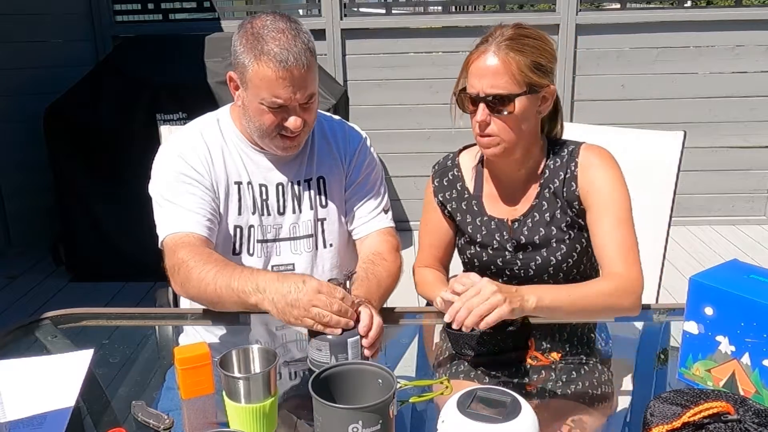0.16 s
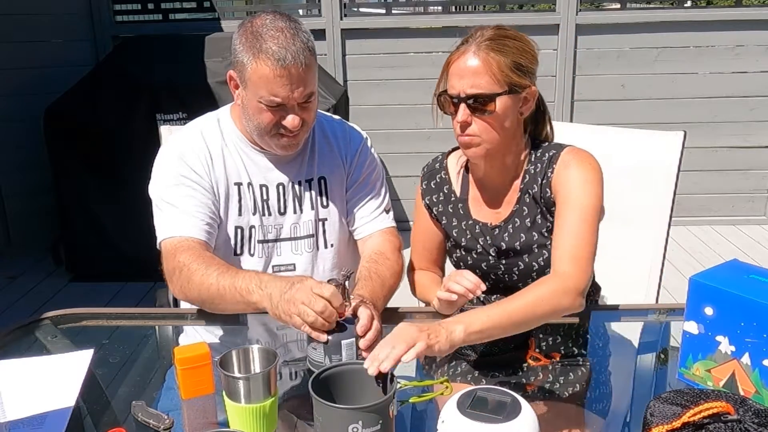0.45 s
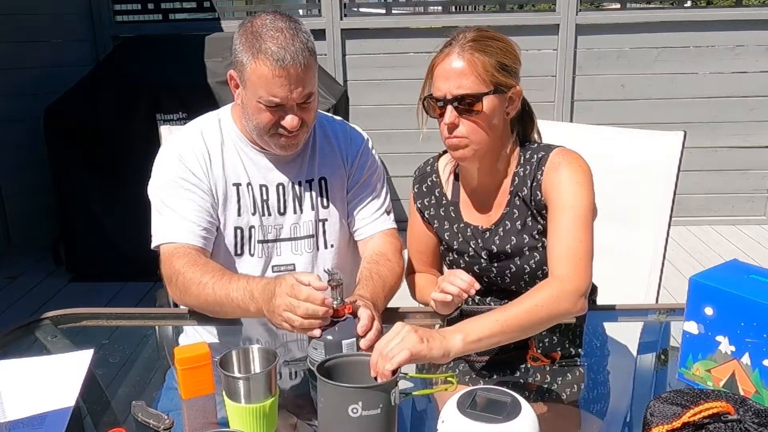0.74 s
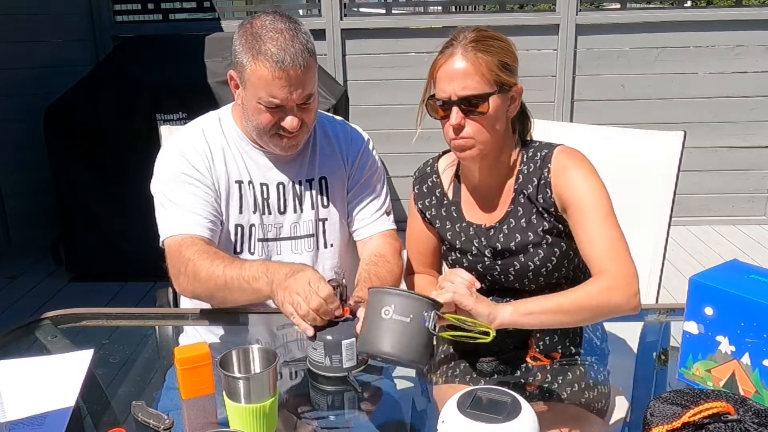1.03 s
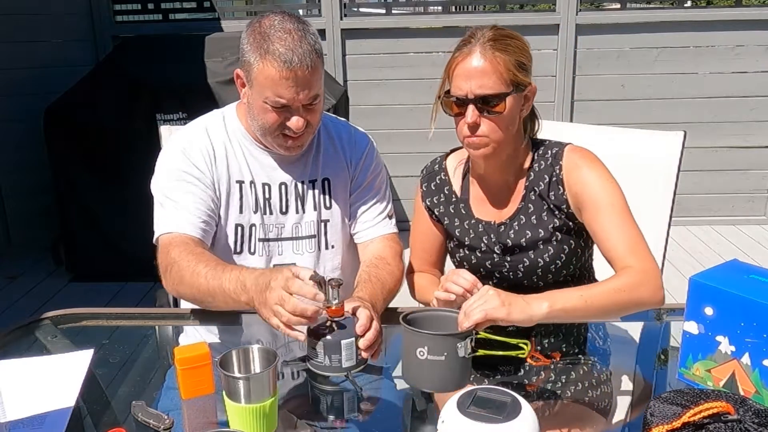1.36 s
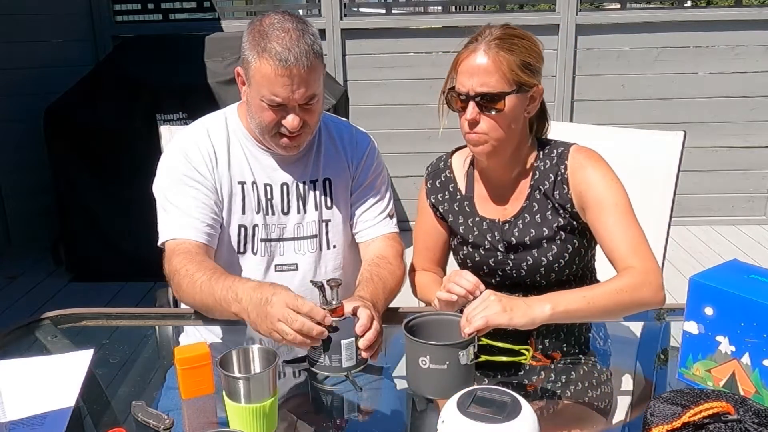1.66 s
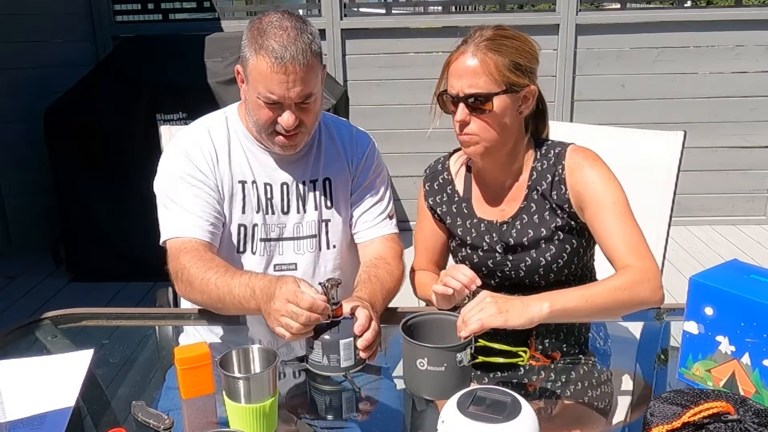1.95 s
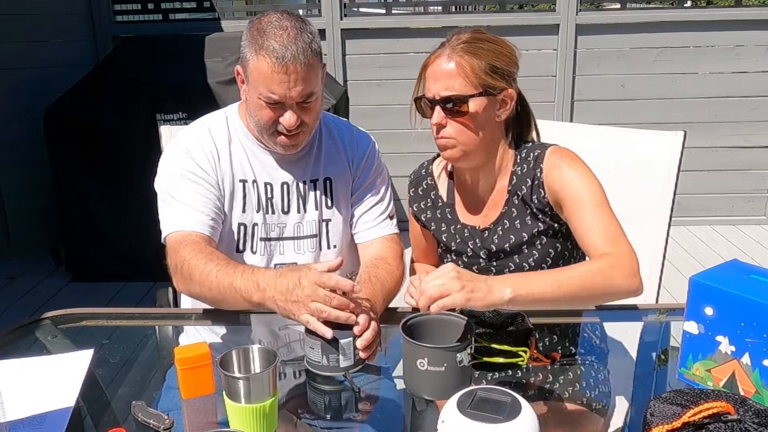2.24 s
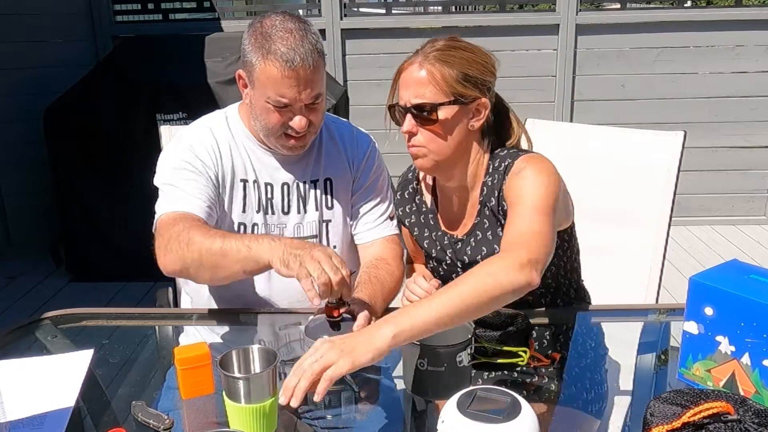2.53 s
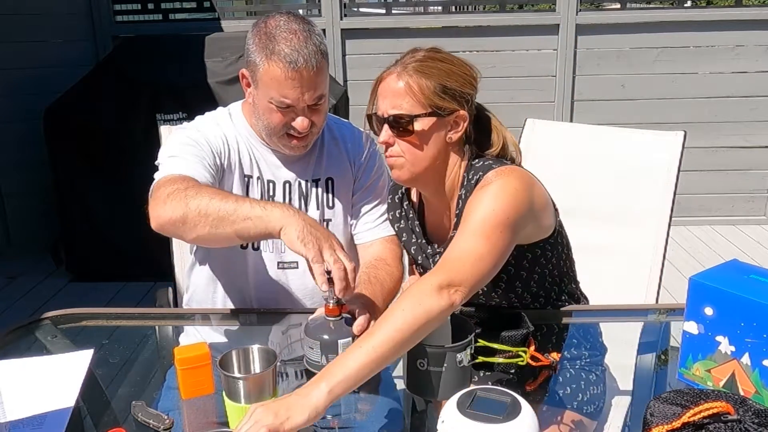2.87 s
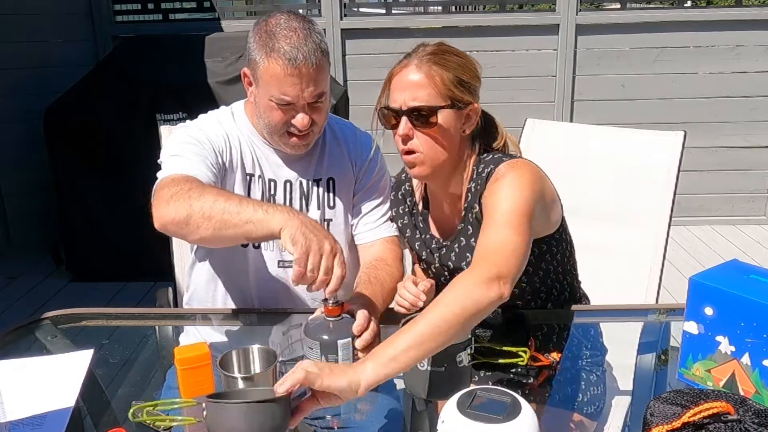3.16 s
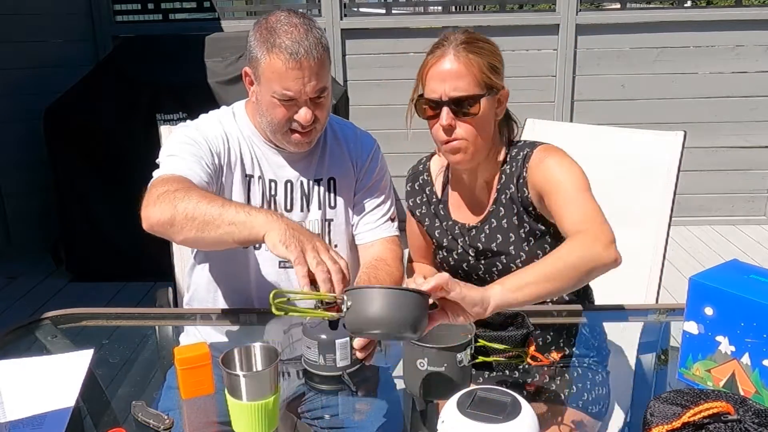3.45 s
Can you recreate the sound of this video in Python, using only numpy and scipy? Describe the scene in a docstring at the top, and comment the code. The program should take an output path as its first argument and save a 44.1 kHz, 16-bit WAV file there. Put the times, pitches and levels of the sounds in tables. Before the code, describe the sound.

Metal cookware clicks lightly while being handled, then a pan clangs against a steel cup.

```python
"""A fenced deck, one microphone close to a glass table where two people handle camping cookware.
A small gas stove snaps, pings, clicks and rubs as it is fitted together, and a pot is set down softly.
Then a lifted pan clangs against a steel cup, and metal knocks down on the table top. Each struck thing
sounds as a few distinct modes over a dense ring. Nearby walls send back short echoes; handling and air
thump on the microphone over a quiet outdoor background."""
import sys
import numpy as np
from scipy import signal
from scipy.fft import rfft, irfft
from scipy.io import wavfile

SR = 44100
rng = np.random.default_rng(int(sys.argv[2]) if len(sys.argv) > 2 else 0)


def output_pcm(signal):
    """Save a mono or channel-first signal as 16-bit PCM at the path in sys.argv[1].

    Samples are clipped to [-1, 1] before scaling.
    """
    pcm = np.clip(np.atleast_2d(signal).T, -1, 1) * 32767
    wavfile.write(sys.argv[1], SR, np.round(pcm).astype(np.int16))


N = 158760
T = np.arange(N) / SR
AGE = T[:int(.3 * SR)]  # seconds since a strike

# The distant background. Each row: frequency in Hz, level per Hz in dB.
OUTDOOR_SPECTRUM = [(22, -2.5), (45, 0), (75, -3), (100, -9), (130, -10), (190, -13.5), (550, -14.5),
                    (800, -11), (980, -10.5), (1200, -15.5), (1600, -20), (2450, -23), (2800, -19),
                    (3200, -26.5), (4500, -33), (7000, -41.5), (11000, -48.5), (16000, -60)]
# Low thumps from handling and air on the microphone, the last one the dull thud of the pan grazing the cup; and
# parts sliding. Each row: middle in seconds, half length in seconds, level in dB, centre in Hz, spread in
# octaves.
LOW_THUMPS = [(.05, .05, -52.5, 77.5, 0.11), (.41, 0.025, -46, 65.4, 0.12), (.5, 0.062, -42.5, 30.5, 0.26),
              (1.045, 0.039, -36, 60.5, 0.28), (1.66, .04, -51, 70.4, 0.27),
              (1.855, 0.023, -47.5, 112, 0.17), (2.02, 0.024, -53.5, 153, 0.11),
              (2.14, 0.05, -53, 120, 0.18), (3.387, 0.0063, -35, 170, 0.31)]
PART_RUBS = [(.052, 0.023, -56.5, 3880, 0.33), (.04, 0.077, -72, 9100, 0.46),
             (.278, 0.016, -66, 5840, 0.54), (.305, 0.032, -69, 12000, .5), (.69, 0.055, -76, 9250, 0.5),
             (1.31, 0.041, -79, 8500, .6), (1.55, 0.033, -76, 8900, 0.7), (2.97, 0.14, -78, 9800, 0.72),
             (3.355, .018, -69, 5956, 0.38)]

# Distinct modes of each struck thing. Each row: frequency in Hz, level in dB, t60 in seconds.
STOVE_MODES = [(2439, -10, .1), (2601, -6, .1), (2665, -10, .12), (3112, .5, .115), (3261, -6, .12),
               (3602, -2, .11), (3930, -8, .1), (4215, -11, .1), (4400, -10, .08), (4689, -4, .075),
               (5200, -13, .08), (5643, -3, .06), (6120, -6, .055), (6660, -7, .055), (7280, -8, .05),
               (7750, -7, .04), (8382, -12, .05)]
WIRE_MODES = [(5820, -0.5, 0.043), (6200, -3, 0.059), (10430, 1, 0.033), (10830, 4.5, 0.035),
              (11400, -8, .05), (15000, -16.5, .06)]
POT_MODES = [(151, -30, .14), (245, -20, .052), (310, -13, .028), (596, 3.5, .064), (696, -17, .05)]
PAN_MODES = [(556, -15, .45), (662, -7, .13), (856, -3, .08), (918, 3, .06), (1001, 2, .12),
             (1150, -14, .12), (1416, -3, .135), (2012, -.5, .185), (2840, -7, .04), (2906, -5, .05),
             (3015, -17, .12), (3340, -7, .06), (3590, -10, .06), (3958, -17, .08), (5070, -19, .09),
             (5335, -21, .08), (5835, -23, .16), (8040, -13, .11), (8668, -12, .105), (9431, -18, .145),
             (10620, -19, .04), (11130, -17, .035), (13450, -21, .03), (13880, -21, .03), (14200, -21, .03)]
PAN_SWELLING_MODES = [(2627, -14, .28), (3214, -6.5, .115), (4770, -8, .085)]  # hardly struck, but fed by the rest of the metal
CUP_TABLE_MODES = [(155, -5, .4), (185, -9, .38), (210, -7, .32), (264, -10, .16), (345, -8, .22),
                   (369, -9, .22), (450, -7, .2), (555, .5, .17), (670, 1, .125), (885, -9, .25),
                   (1050, -14, .22), (1401, -8, .15), (1477, -8, .19), (2579, -1.5, .13), (2676, -11, .19),
                   (3025, -13, .16), (7440, -21, .1), (11300, -21, .04)]
# Their dense rings. Each row: frequency in Hz, level per third octave in dB, t60 in seconds.
STOVE_BODY = [(500, -26, 0.061), (1250, -26.5, 0.11), (1950, -9, 0.15), (2950, 2.5, 0.13),
              (3920, -2.5, .11), (5300, 3, 0.056), (7550, 0.5, 0.053), (9000, -11, 0.098),
              (10900, -18, 0.11), (15000, -27, .075)]
WIRE_BODY = [(2980, -22, .08), (6140, -10.5, 0.27), (8300, -20, 0.17), (11000, -5, .09), (13000, -28, 0.11),
             (15500, -15, .1)]
POT_BODY = [(152, -29.5, .26), (306, -29, .2), (615, -23, .24), (750, -25, .2), (1000, -35, .18),
            (2500, -37, .054), (15000, -72, .054)]
PAN_BODY = [(152.5, -26.5, .28), (348, -24, .45), (720, -21, .23), (1000, -14, .12), (1310, -17, .17),
            (2180, -23, .2), (3080, -15, .15), (4000, -22, .12), (5100, -21, .17), (6600, -28, .15),
            (11000, -29, .087), (14500, -39, .085)]
PAN_CRACK = [(151, -14.5, .04), (400, -19, .024), (700, -5, .027), (960, 12, .026), (1440, -3, .02),
             (2250, -4, .02), (3200, 9, .022), (4400, -11, .035), (5130, 1, .027), (6400, -14, .02),
             (7700, -5, .024), (9400, -6.5, .027), (10900, .5, .018), (12200, -12.5, .02), (13900, -5, .02),
             (15500, -16, .02)]  # the brief crack of contact
CUP_TABLE_BODY = [(70, -23, .46), (159, -15, .55), (443, -8.5, .24), (950, -1, .15), (1160, -8, .24),
                  (2320, -7.5, .29), (3680, -7.5, .084), (4900, -3.5, .073), (6400, -17, .069),
                  (9000, -25, .11), (11200, -24, .06), (15000, -36, .045)]

# Small parts click. Each row: start in seconds, level in dB, lower and upper resonance in Hz,
# upper resonance's relative level in dB, width in octaves, tick's relative level in dB, t60 in seconds.
PART_CLICKS = [(0.3373, -44.5, 2500, 4310, -2, 0.16, -6.5, 0.11),
               (0.7882, -68.5, 4930, 11000, -1, 0.4, 2, 0.053),
               (0.993, -69.5, 6400, 9500, -3, 0.22, -14, 0.045), (1.012, -75, 6400, 9500, 1, .25, -12, .04),
               (1.365, -71, 10000, 13000, 0, .2, -12, .04), (1.5367, -70, 5470, 10000, -5, .3, -12, 0.055),
               (1.5916, -70, 5400, 8500, -2, 0.27, -11, .045),
               (1.6698, -65.5, 6360, 9500, 3, 0.14, -16, 0.05),
               (1.713, -70, 8200, 12800, 5, 0.25, -5, 0.05),
               (1.7647, -52.5, 2880, 4590, 7.5, 0.21, -1, 0.095),
               (2.0881, -60, 4540, 7200, 0.5, 0.35, 3.5, 0.1),
               (2.7481, -58, 2680, 4770, -7.5, 0.16, -7, 0.21)]
# The body all clicks share. Each row: frequency in Hz, level per third octave in dB, factor on t60.
CLICK_BODY = [(900, 7, 1), (2500, 0.5, 1.6), (4970, 3.5, 0.8), (14900, -5.5, 1.6)]
# The pot lands and settles. Each row: start in seconds, level in dB.
POT_LANDINGS = [(1.7128, -17.5), (1.7435, -32)]
# The pan meets the cup. Each row: start in seconds, ring level in dB, ring tilt in dB per octave,
# crack level in dB, crack tilt in dB per octave.
PAN_CLANGS = [(3.3817, -32.5, -4.5, -34, 3), (3.4007, -15, -0.5, -19.5, 0.5)]
# Metal meets the table. Each row: start in seconds, level in dB, tilt in dB per octave.
TABLE_KNOCKS = [(3.5017, -24.5, 0.3), (3.5129, -37.5, -3)]
# Echoes off table, wall and fence. Each row: delay in seconds, level in dB.
DECK_ECHOES = [(0.0095, -31.5), (0.0216, -12.5), (.0295, -21)]


def amp(db):
    """Decibels to gain."""
    return 10 ** (np.asarray(db) / 20)


def at(hz, table, column=1):
    """Read a column of a table on a log-frequency axis."""
    table = np.array(table, float)
    return np.interp(np.log(hz), np.log(table[:, 0]), table[:, column])


def hump_db(hz, centre_hz, octaves):
    """A bell-shaped emphasis around one frequency."""
    return -10 / np.log(10) * (np.log2(hz / centre_hz) / octaves) ** 2


def noise(gain, size=N):
    """Unit noise, its spectrum shaped by a gain at each frequency."""
    hz = np.maximum(np.arange(size // 2 + 1) * SR / size, 1)
    x = irfft(rfft(rng.standard_normal(size)) * gain(hz), size)
    return x / np.std(x)


def fade(t60, rise_s):
    """A smooth rise, and an exponential decay of 60 dB in t60 seconds."""
    return np.sin(np.pi / 2 * np.minimum(AGE / rise_s, 1)) ** 2 * np.exp(-np.log(1000) * AGE / t60)


def ring(modes, rise_s, colour=lambda hz: 0, sign=-1):
    """Distinct modes of a struck object; neighbours start in opposition, or together if sign is 1."""
    out = 0
    for k, (hz, db, t60) in enumerate(modes):
        tone = sign ** k * np.sqrt(2) * np.sin(2 * np.pi * hz * AGE)
        out += amp(db + colour(hz)) * fade(t60, rise_s) * tone
    return out


def dense(body, rise_s, stretch=1, colour=lambda hz: 0):
    """Modes too close to tell apart: third-octave noise bands, each with its own decay."""
    out, edge = 0, 2 ** (1 / 6)
    gain = lambda f: amp(at(f, body) + 20 * np.minimum(np.log2(f / body[0][0]), 0) + colour(f))
    for hz in 62.5 * 2 ** (np.arange(25) / 3):
        envelope = fade(at(hz, body, column=2) * stretch, rise_s)
        band = envelope * noise(lambda f: (f > hz / edge) * (f <= hz * edge) * gain(f), len(AGE))
        power = np.mean(gain(np.linspace(hz / edge, hz * edge)) ** 2)
        out += band * np.sqrt(power * np.sum(envelope ** 2) / np.sum(band ** 2))
    return out


def add(track, start, sound):
    """Mix a sound into the track at a start in seconds."""
    i = int(start * SR)
    track[i:i + len(sound)] += sound[:N - i]


def outdoors():
    """A quiet, distant wash whose level barely drifts."""
    drift = np.interp(T, np.linspace(0, T[-1], 14), rng.standard_normal(14))
    return amp(-51 + .3 * drift) * noise(lambda f: amp(at(f, OUTDOOR_SPECTRUM)))


def handling(swells):
    """Short swells of noise: high where parts slide, low where handling and air reach the microphone or the pan
    grazes the cup."""
    out = np.zeros(N)
    for middle, half_s, db, hz, octaves in swells:
        envelope = np.exp(-.5 * ((T - middle) / half_s) ** 2)
        out += amp(db) * envelope * noise(lambda f: amp(hump_db(f, hz, octaves)))
    return out


def stove_assembly():
    """A steel part snaps into place and rings the stove; then a thin wire part pings."""
    out = np.zeros(N)
    snap = dense(STOVE_BODY, rise_s=.00055) + ring(STOVE_MODES, rise_s=.0003)
    ping = ring(WIRE_MODES, rise_s=.0018) + dense(WIRE_BODY, rise_s=.002)
    add(out, start=.091, sound=amp(-30) * snap)
    add(out, start=.2817, sound=amp(-44.5) * ping)
    return out


def stove_clicks():
    """Small parts touch: two resonances over a broad, shorter tick, and the stove rings along."""
    out = np.zeros(N)
    tick_hz, tick_top_hz = 2780, 9500
    for start, db, low_hz, high_hz, high_db, octaves, tick_db, t60 in PART_CLICKS:
        def resonance_db(f):
            upper = high_db + hump_db(f, high_hz, octaves)
            return np.maximum(hump_db(f, low_hz, octaves), upper).clip(-80)

        def tick_colour(f):
            rolloff_db = 10 * np.log10(1 + (f / tick_top_hz) ** 6)
            return tick_db - 5.5 * np.abs(np.log2(f / tick_hz)) - rolloff_db

        part = dense(CLICK_BODY, rise_s=.0003, stretch=t60, colour=resonance_db)
        tick = dense(CLICK_BODY, rise_s=.00021, stretch=.48 * t60, colour=tick_colour)
        stove = ring(STOVE_MODES, rise_s=.0003, colour=lambda f: np.maximum(resonance_db(f), -15))
        add(out, start, amp(db) * (part + tick + amp(5) * stove))
    return out


def pot_set_down(contact_s=.0073):
    """The pot lands softly and settles; the slow contact makes a dull bump."""
    out = np.zeros(N)
    for start, db in POT_LANDINGS:
        add(out, start, amp(db) * (ring(POT_MODES, contact_s) + dense(POT_BODY, contact_s)))
    return out


def pan_clang():
    """The pan grazes the cup, then hits hard: a crack, and thin metal ringing, damped by the hand."""
    out = np.zeros(N)
    for start, ring_db, ring_tilt, crack_db, crack_tilt in PAN_CLANGS:
        tilt = lambda f: ring_tilt * np.log2(f / 1500)
        struck = ring(PAN_MODES, rise_s=.0013, colour=tilt, sign=1)
        swelling = ring(PAN_SWELLING_MODES, rise_s=.032, colour=tilt)
        body = dense(PAN_BODY, rise_s=.0011)
        crack = dense(PAN_CRACK, rise_s=.00051, colour=lambda f: crack_tilt * np.log2(f / 3000))
        add(out, start, amp(ring_db) * (struck + swelling + body) + amp(crack_db) * crack)
    return out


def table_knock():
    """Metal knocks down on the glass top and rocks; cup and table ring together."""
    out = np.zeros(N)
    for start, db, db_per_octave in TABLE_KNOCKS:
        tilt = lambda f: db_per_octave * np.log2(f / 1000)
        modes = ring(CUP_TABLE_MODES, rise_s=.002, colour=tilt)
        body = dense(CUP_TABLE_BODY, rise_s=.0007, colour=tilt)
        add(out, start, amp(db) * (modes + body))
    return out


def deck(direct, echo_top_hz=3450):
    """Surfaces near the microphone add a few dull echoes and a faint scattered tail."""
    dull = signal.sosfilt(signal.butter(1, echo_top_hz, fs=SR, output="sos"), direct)
    echoes = sum(amp(db) * np.interp(T - delay, T, dull, left=0) for delay, db in DECK_ECHOES)
    tail = fade(t60=.25, rise_s=.015) * rng.standard_normal(len(AGE))
    scatter = amp(-25) * signal.fftconvolve(direct, tail / np.linalg.norm(tail))[:N]
    return direct + scatter + echoes


def scene():
    """In mono: cookware close by, thumps on the microphone itself and the low thud of the pan's graze, the
    outdoors far behind."""
    stove = stove_assembly() + stove_clicks() + handling(PART_RUBS)
    cookware = stove + pan_clang() + pot_set_down() + table_knock()
    return (deck(cookware) + handling(LOW_THUMPS) + outdoors())[None]


def record(dry, ceiling=.88, top_hz=15800):
    """The recorder rounds off the loudest peaks and cuts the top."""
    rounded = dry / (1 + (dry / ceiling) ** 6) ** (1 / 6)
    return signal.sosfilt(signal.ellip(8, .2, 80, top_hz, fs=SR, output="sos"), rounded)


dry = scene()
out = record(dry)
output_pcm(out)
```